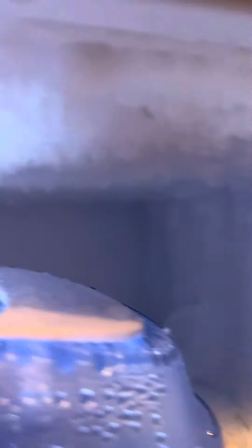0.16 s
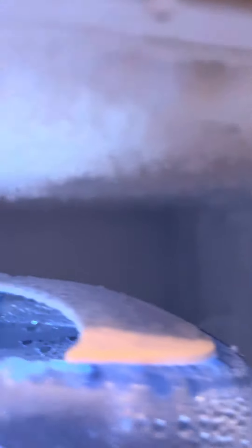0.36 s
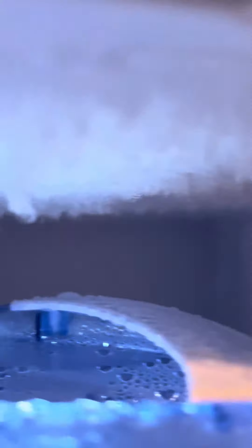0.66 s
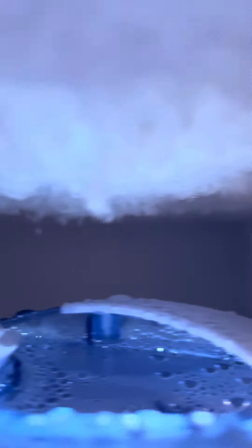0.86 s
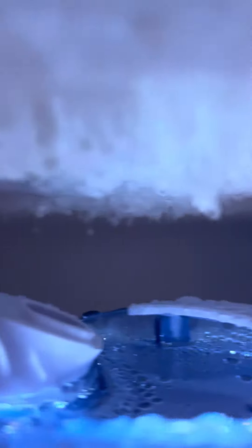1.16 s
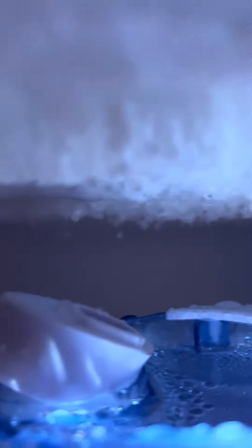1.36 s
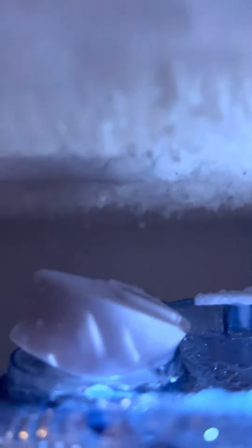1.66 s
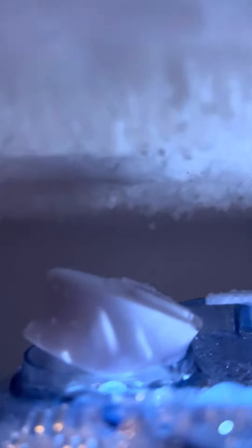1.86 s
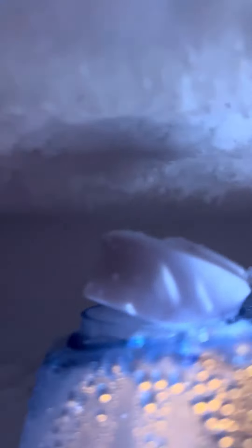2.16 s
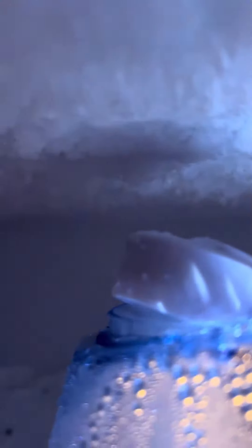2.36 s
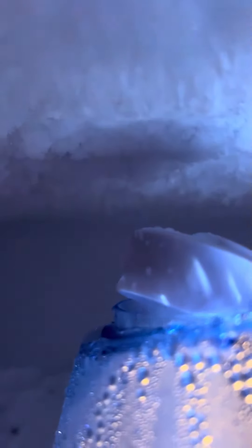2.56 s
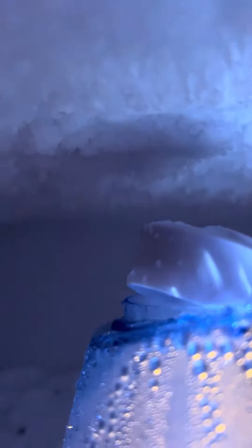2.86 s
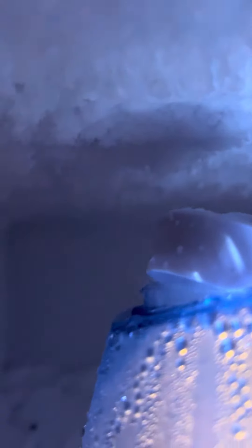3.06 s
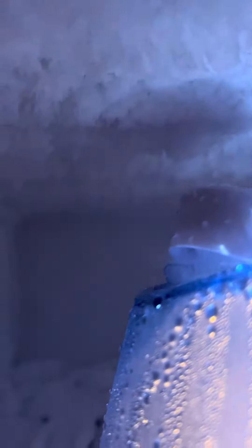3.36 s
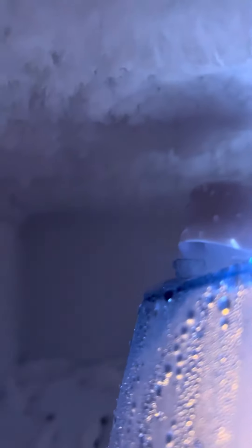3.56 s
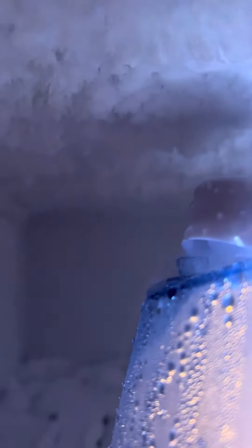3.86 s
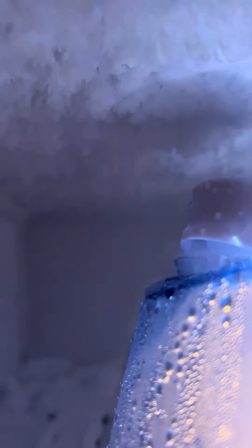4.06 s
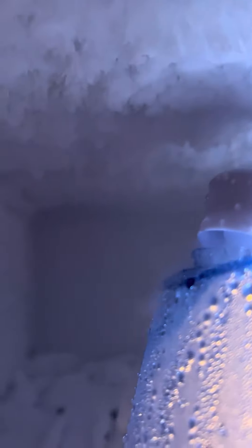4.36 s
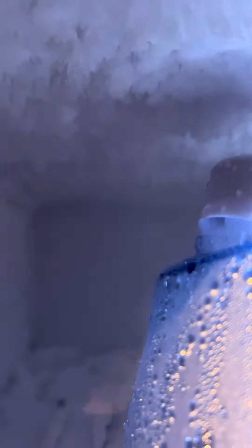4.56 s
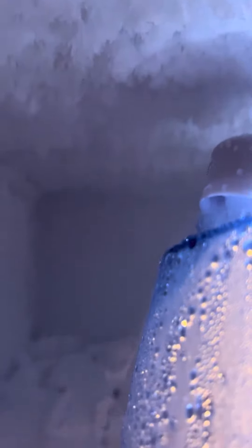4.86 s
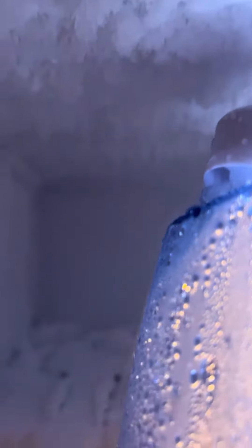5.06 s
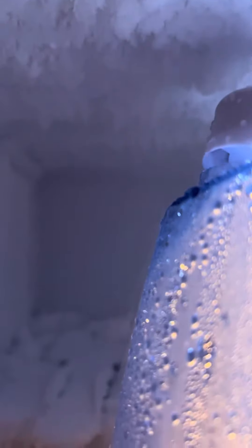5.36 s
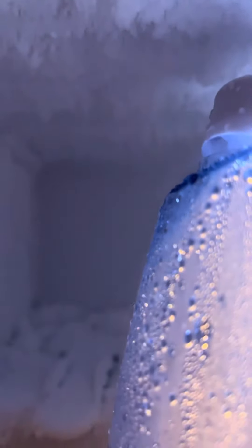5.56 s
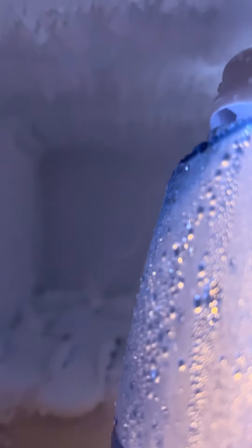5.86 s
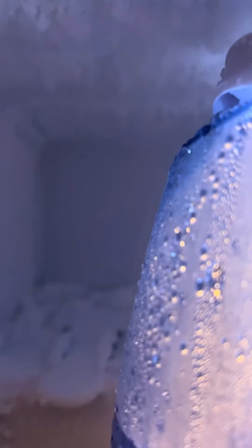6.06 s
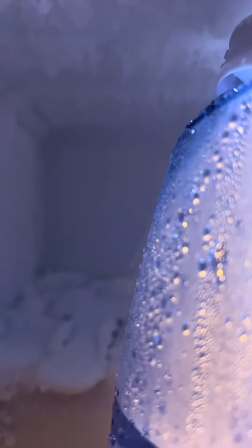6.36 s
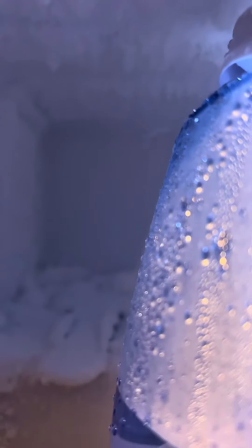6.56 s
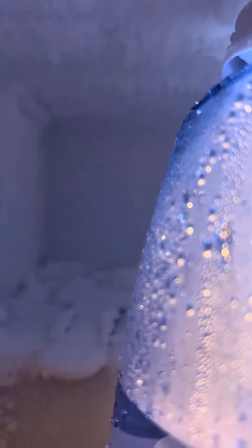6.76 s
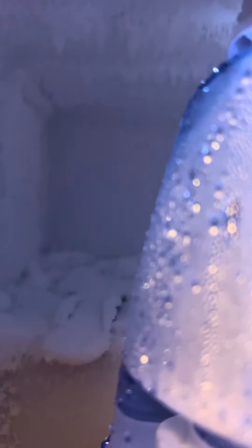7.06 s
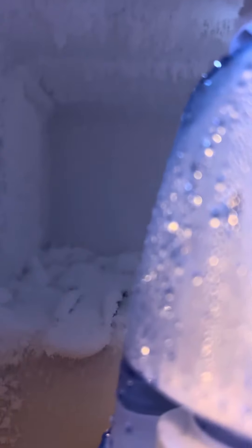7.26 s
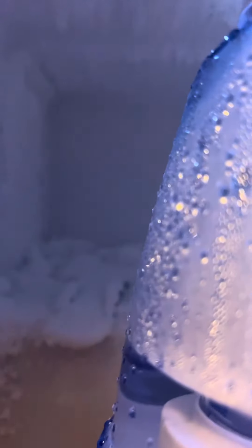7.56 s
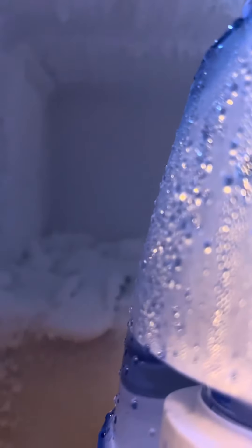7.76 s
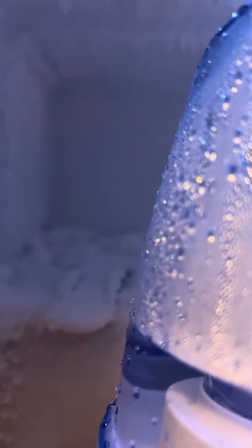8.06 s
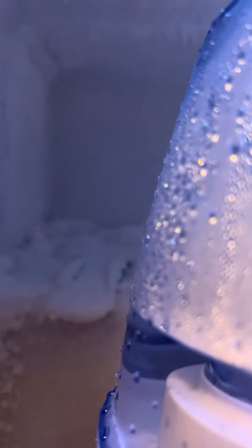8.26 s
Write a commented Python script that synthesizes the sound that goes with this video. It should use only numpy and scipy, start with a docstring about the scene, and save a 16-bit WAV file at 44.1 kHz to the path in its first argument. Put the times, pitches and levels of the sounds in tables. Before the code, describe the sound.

Inside a small frosted freezer, steady bass hum dominates, with brief dips near two seconds and at the end. Beneath the soft hiss, fine water droplets patter and fizz in irregular clumps. Ticks become frequent after the first second, with sharper knocks around 4.3 and 5.1 seconds and a last bright cluster near 8.4. The handheld stereo microphone starts near the door and works inward, close to the sounds.

```python
"""A compressor hums in a frosted freezer compartment over soft air hiss while a small humidifier spits water.
Near the door at first, the microphone dulls the drops and loses a few hum orders around 0.6 s; then it works
its way inside, easing out a little near 6 s. Ticks stand out, the strongest at 4.3, 5.1 and 8.4 s.
The hum is summed sines that beat with other motors and the mains; the hiss is noise in bands;
drops strike resonators, and each tick is a short puff of noise."""
import sys
import numpy as np
from scipy import signal
from scipy.io import wavfile

SR = 44100
rng = np.random.default_rng(int(sys.argv[2]) if len(sys.argv) > 2 else 0)


def invert_db(level):
    """Linear amplitude ratio for a level in decibels (20 dB per decade), elementwise."""
    return 10 ** (np.asarray(level, dtype=float) / 20)


def digitize_waveform(pressure):
    """Quantize a signal to 16-bit integers and store it at the path in sys.argv[1].

    Rows of a 2-D input are taken as channels; values are limited to [-1, 1].
    """
    field = np.atleast_2d(pressure).T
    bounded = np.clip(field, -1, 1)
    quanta = np.round(bounded * 32767).astype(np.int16)
    wavfile.write(sys.argv[1], SR, quanta)


N = 371322
TURN_HZ = 58.914   # turn rate of the compressor

# place of the microphone, from the door (0) to the back (1): (time [s], depth [0-1])
DEPTH = [(0, 0.27), (.7, 0), (1.4, 0.32), (2, 0.57), (3, 0.72), (4.5, 0.82), (6, 0.69), (7.3, 0.91),
         (8.42, 0.95)]


def rms_one(x):
    """Scale to unit rms."""
    return x / np.sqrt(np.mean(x ** 2) + 1e-20)


def in_time(rows):
    """Columns of a table, joined by straight lines at every sample."""
    s, *columns = np.transpose(rows)
    return [np.interp(np.arange(N) / SR, s, c) for c in columns]


def at_hz(points, hz):
    """Read a spectrum on a log-frequency axis."""
    table_hz, values = np.transpose(points)
    return np.interp(np.log(hz), np.log(table_hz), values)


def drift(corner_hz):
    """Slow chance of spread 1: noise twice through a one-pole low-pass, made at every 40th sample."""
    r = np.exp(-2 * np.pi * corner_hz * 40 / SR)
    noise = rng.standard_normal(N // 40 + 2002)
    slow = signal.lfilter([1], [1, -2 * r, r * r], noise)[2000:]   # skip the filter's start
    return np.interp(np.arange(N) / 40, np.arange(len(slow)), rms_one(slow))


def band(x, hz, octaves):
    """Band-pass around a centre."""
    edges = hz * 2.0 ** (np.array([-.5, .5]) * max(octaves, .05))
    edges = np.clip(edges, 10, .45 * SR)
    return signal.sosfilt(signal.butter(2, edges, "band", fs=SR, output="sos"), x)


def sides(db):
    """Left and right gains for a left-right level difference."""
    return invert_db(np.array([[db / 2], [-db / 2]]))


def air(patchy_db):
    """Air hiss: third-octave bands of stereo noise, each with its own level, flicker and left-right likeness."""
    # hiss spectrum, relative: (frequency [Hz], level per Hz [dB])
    spectrum = [(25, -25.5), (45, -6), (80, -3), (130, -7), (200, 0.5), (250, -19), (320, -14),
                (420, -10.5), (620, -17.5), (780, -12.5), (900, -24.5), (1050, -19.5), (1400, -24.5),
                (2600, -28), (3200, -32), (5000, -33.5), (6300, -42), (7500, -45), (9500, -51.5),
                (12000, -47.5), (13800, -53), (15500, -49.5)]
    # change of the hiss from the door to the back: (frequency [Hz], change [dB])
    inside = [(200, 0), (300, 1.5), (450, 4), (700, -3), (1050, -2.5), (1800, -4.5), (3500, 10),
              (5500, 3.5), (7500, 8.5), (10000, -1.5)]
    # how alike the two sides are: (frequency [Hz], left-right likeness [-1 to 1])
    likeness = [(60, 1), (130, 0.99), (200, .98), (290, .9), (450, 0.64), (640, 0.41), (1300, 0.5),
                (1750, 1), (2300, 0.84), (3100, 0.077), (6820, 0.64), (15000, .1)]
    # balance of the two sides: (frequency [Hz], left-right difference [dB])
    balance = [(60, -2), (110, 1), (200, 3), (380, 4.5), (700, 1.5), (1290, 0.5), (2380, 0), (4400, 1),
               (8120, -0.5), (15000, 0.0)]
    level_db = -53.5   # rms of the whole hiss
    out, together, (depth,) = 0, drift(15.0), in_time(DEPTH)
    white = rng.standard_normal((2, 2, N))   # neighbouring bands get unrelated noise
    for k, hz in enumerate(28 * 2 ** np.arange(0, 9.3, 1 / 3)):
        mid, side = band(white[k % 2], hz, 1 / 3)
        alike = np.clip(at_hz(likeness, hz), -1, 1)
        flicker = 1.15 * together + 0.91 * drift(18)
        flicker_db = patchy_db * min(hz / 3000, 1) * flicker   # the treble is the least even
        band_db = at_hz(spectrum, hz) + (depth - .5) * at_hz(inside, hz) + flicker_db
        stereo = np.sqrt(1 + alike) * mid + np.sqrt(1 - alike) * side * [[1], [-1]]
        out = out + invert_db(band_db) * sides(at_hz(balance, hz)) * stereo
    return invert_db(level_db) * rms_one(out)


def falls(per_s, spread_db, clump_db):
    """Moments (samples) and sizes of the drops: random falls whose rate drifts, so they land in clumps."""
    chance = per_s * invert_db(clump_db * drift(11.0)) / SR
    at = np.flatnonzero(rng.random(N) < chance)
    return at, invert_db(spread_db * np.minimum(rng.exponential(1, N), 4))[at]


def cavity(hz, width_hz, level_db, drops, drop_share):
    """Splash noise and the drops ring a hollow whose pitch shifts with the microphone's place."""
    at, sizes = drops
    struck = np.zeros(N)
    struck[at] = sizes
    drive = rng.standard_normal((2, N)) * (1 - drop_share + drop_share * rms_one(struck))
    pole = [1, -np.exp(-np.pi * width_hz / SR)]   # used twice: a soft onset
    envelope = signal.lfilter([1], pole, signal.lfilter([1], pole, drive))
    phase = 2 * np.pi * np.cumsum(hz) / SR
    ring = envelope[0] * np.cos(phase) + envelope[1] * np.sin(phase)
    return invert_db(level_db) * rms_one(ring)


def fine_spray(depth):
    """Fizz of the fine spray: a dense mist of drops rings a higher, broader resonance, separately on each side."""
    # swell of the fizz: (time [s], level [dB])
    swell = [(0, -92), (.85, -75), (1.0, -83), (1.9, -83), (2.1, -83), (3.5, -74), (5.5, -82), (6.5, -87),
             (7.4, -95), (8.42, -84)]
    door_hz, back_hz = 4810, 6950
    fizz_hz, (fizz_db,) = door_hz + (back_hz - door_hz) * depth, in_time(swell)
    mist = falls(per_s=1500, spread_db=5.5, clump_db=9.0)
    return np.array([cavity(fizz_hz, 1300, fizz_db, mist, drop_share=0.9) for side in range(2)])


def droplets(level_db, depth, drops, pick_db, cycles, tilt_db, onset_octaves):
    """Each drop rings the tank at 2 to 7.6 kHz, a few pitches strongly, the rest faintly; each pitch has its side."""
    dulled_db_per_octave = -10.5   # above 4 kHz, at the door; gone at the back
    at, sizes = drops
    out = np.zeros((2, N))
    for hz, lag in zip(np.geomspace(2000, 7600, 30), rng.integers(-4, 5, 30)):   # lag of the right in samples
        pick = invert_db(pick_db * np.minimum(rng.standard_normal(N)[at], 1.8))
        clicks = np.full(N, 1e-18)
        clicks[at] = sizes * pick * rng.choice([-1, 1], N)[at]
        r = invert_db(-60 * hz / (cycles * SR))   # 60 dB down after this many cycles
        w = 2 * np.pi * hz / SR
        ring = signal.lfilter([0, np.sin(w)], [1, -2 * r * np.cos(w), r * r], clicks)
        ring = band(ring, hz, onset_octaves)   # a soft landing: no sharp click
        dulled_db = dulled_db_per_octave * (1 - depth) * max(np.log2(hz / 4000), 0)
        pitch_db = tilt_db * np.log2(hz / 2000) + dulled_db
        out += invert_db(pitch_db) * np.array([ring, np.roll(ring, lag)])
    return invert_db(level_db) * rms_one(out)


def ticks(shared, snap, ragged_db):
    """Each tick is a sudden puff of noise in its own band that dies within hundredths of a second."""
    # ticks, levels before the echo: (time [s], peak before the side gains [dB], centre [Hz],
    # width [octaves], left-right difference [dB])
    tick_rows = [(0.908, -43, 5570, 0.41, 0), (1.095, -58, 5000, .6, 0), (1.67, -63, 7300, .4, 3),
                 (1.402, -59, 13000, .6, 0), (1.53, -58, 9500, 0.94, 0), (1.794, -47, 1610, 0.17, 0),
                 (1.932, -50, 5400, 1, 1), (1.933, -48, 1610, 0.52, 0), (1.962, -47, 13550, 1.15, 0),
                 (2.0245, -43.5, 2450, 0.45, 1), (2.025, -47, 1620, 0.28, 1), (2.05, -51.5, 4760, 0.6, 2),
                 (2.264, -53, 5470, 0.78, 0), (2.461, -51, 5600, 0.8, 0), (3.099, -53, 2200, 0.97, 0),
                 (3.24, -49, 4730, 0.42, .5), (3.481, -49, 3580, 0.77, 4), (3.567, -46.5, 8300, 0.33, -1),
                 (3.956, -49, 3220, 0.35, .5), (4.146, -50, 4740, 0.73, 2), (4.174, -52.5, 4630, 0.54, 4),
                 (4.212, -55, 4970, 0.48, 0), (4.225, -49, 420, .3, 3), (4.25, -51, 420, 0.19, 3),
                 (4.292, -58, 3000, 0.23, -2), (4.3012, -37.5, 2600, 1.36, -6), (4.302, -38, 1970, 0.69, 0),
                 (4.519, -64, 13100, .6, 0), (4.585, -57, 3500, 0.45, 0), (4.6, -55, 4000, .2, 0),
                 (4.608, -59, 14500, .4, 0), (4.632, -52, 3600, 0.78, 0), (4.665, -46, 2600, 1.1, 0),
                 (5.014, -49, 2000, 0.4, 0), (5.11, -38, 2530, 0.84, -2), (5.1135, -39.5, 2080, 0.64, -2),
                 (5.549, -45.5, 12050, 1.2, 0), (5.577, -50, 3730, 0.7, -2),
                 (5.673, -46.5, 4030, 0.36, 1.5), (5.711, -49, 2160, 0.87, 0), (5.695, -53, 6500, .5, 0),
                 (5.78, -57, 4300, .5, -2), (5.847, -49, 4200, 0.85, 5), (5.891, -50, 14700, 0.72, 2),
                 (5.914, -49.5, 3400, 0.83, 2), (6.055, -50, 2750, 0.55, -.5), (6.187, -52, 4200, .5, 0),
                 (6.29, -58, 4800, 0.18, 0), (6.31, -56, 1730, 0.27, 0), (6.347, -52, 4250, 0.57, -2),
                 (6.485, -48.5, 3470, 0.37, 4), (6.503, -46, 2600, 1.2, 0), (6.555, -50, 4000, 0.62, 0),
                 (6.658, -49, 3600, 0.7, 1.5), (6.674, -48, 3200, 0.62, 2), (6.764, -55, 4100, .3, 0),
                 (6.866, -52.5, 1730, 0.34, -1), (6.868, -51, 4530, 0.33, 0), (6.95, -46.5, 1730, 0.24, 2),
                 (6.958, -51, 4260, 0.26, 0), (7.134, -64, 4800, .5, 16), (7.215, -41.5, 2400, 1.7, 0),
                 (7.355, -52, 3930, .4, 0), (7.377, -51.5, 8380, 0.82, 0), (7.459, -47, 3200, 1.5, 0),
                 (7.593, -44, 3260, 1.1, -4), (7.645, -47, 4240, 0.73, 0), (7.8, -57, 1730, .25, 0),
                 (8.135, -54, 3400, 0.52, 6), (8.18, -54, 3000, 0.48, 0), (8.195, -51, 1590, 0.4, 2),
                 (8.365, -47, 410, 0.23, 3), (8.372, -43, 11900, .35, 0), (8.374, -50, 14600, .25, 1),
                 (8.373, -50, 4200, 0.44, 1), (8.373, -40, 8600, .45, 1)]
    faint_count, faint_db, faint_hz = 6, -68, 13500   # very high faint ticks at random moments
    rise_s, right_lag = 0.00056, 1   # time constant of the onset; samples by which the right comes later
    out, t = np.zeros((2, N + 4096)), np.arange(4096) / SR
    faint = []
    for _ in range(faint_count):
        level_chance, side_chance = rng.standard_normal(2)
        faint.append((rng.random() * N / SR, faint_db + 3 * level_chance, faint_hz, .6, side_chance))
    for s, peak_db, hz, octaves, side_db in list(tick_rows) + faint:
        # 12 ms at 4 kHz and .6 octave; higher and wider ticks die sooner
        t60 = 0.012 * (hz / 4000) ** -0.1 * (max(octaves, .05) / .6) ** -0.5
        envelope = invert_db(-60 * t / t60) * (1 - np.exp(-t / rise_s))
        common, left, right = rng.standard_normal((3, len(t))) * envelope
        common *= invert_db(ragged_db * np.repeat(rng.standard_normal(64), 64))   # the contact stutters
        common[0] += snap * octaves ** 2   # the first contact is a hard snap, strongest in broad ticks
        both = np.array([common, np.roll(common, right_lag)])
        puff = band(shared * both + (1 - shared) * np.array([left, right]), hz, octaves)
        puff = band(puff, hz, 2.1 * octaves)   # steeper skirts
        at = round(s * SR)
        out[:, at:at + len(t)] += invert_db(peak_db) * sides(side_db) * puff / np.abs(puff).max()
    return out[:, :N]


def compartment(x):
    """The small hard box answers every drop and tick with a short dense tail, its own on each side."""
    t60_s, echo_db, frost_cut_hz = 0.065, -9, 7000   # frost soaks up the treble
    t = np.arange(4096) / SR
    tail = rng.standard_normal((2, len(t))) * invert_db(-60 * t / t60_s) * (t > .002)
    tail = signal.lfilter(*signal.butter(1, frost_cut_hz, fs=SR), tail)
    tail = invert_db(echo_db) * tail / np.sqrt(np.sum(tail ** 2, axis=1, keepdims=True))
    return x + signal.fftconvolve(x, tail, axes=1)[:, :N]


def other_tones(waver_db):
    """Steady sines of the mains and of other machines, each wavering slowly in level."""
    # tones: (frequency [Hz], rms level in the hum [dB])
    tones = [(156.98, -62.5), (239.99, -73), (357.66, -78), (359.96, -74), (479.94, -76)]
    t, out = np.arange(N) / SR, np.zeros(N)
    for hz, level_db in tones:
        out += invert_db(level_db + waver_db * drift(0.52)) * np.sin(2 * np.pi * hz * t)
    return out


def whines(turn, waver_db, blur_rad):
    """Thin whines: high orders of the turn rate, pulsed once a turn and heard only at some places."""
    # whines: (multiple of the turn rate, greatest rms level before the pulsing [dB],
    # loudest at [s], time from there to a fade of 4.3 dB [s], left-right difference [dB])
    whine_rows = [(49, -77.5, 2.3, 1.27, -2), (50, -86, 1.6, 0.97, -2), (51, -80.5, 0.092, 0.23, 5),
                  (52, -83, 0.12, 0.33, 8), (52, -79.5, 3.95, 0.99, 8.5), (56, -87, 1.3, 0.38, 13),
                  (57, -82.5, 1.5, 0.49, 11), (58, -82, 1.9, 1.1, 6), (59, -88, 2.3, 0.87, 4),
                  (60, -96, 1.3, 0.71, 2), (189, -99, 6.9, 1.4, 8), (187, -101, .5, .5, 0)]
    t, out = np.arange(N) / SR, np.zeros((2, N))
    pulse = invert_db(2.3 * np.cos(turn))
    for multiple, level_db, at_s, length_s, side_db in whine_rows:
        heard = np.exp(-.5 * ((t - at_s) / length_s) ** 4) * pulse
        level = invert_db(level_db + waver_db * drift(12.0)) * sides(side_db)
        out += heard * level * np.sin(multiple * turn + blur_rad * drift(8.0))
    return out


def upper_orders(turn, depth, waver_db):
    """Steadier multiples of the turn rate, which trail the lowest ones and waver in level."""
    # orders: (multiple of the turn rate, rms level at the back before the sides [dB],
    # rise from door to back [dB])
    orders = [(4, -66.5, 2.5), (5, -66.5, 3.5), (6, -82.5, 1), (7, -73.5, -1.5), (8, -63, 12), (9, -59, 5),
              (10, -84.5, -7), (11, -71, -1.5), (12, -69.5, 5), (13, -81, 14), (14, -77, 6.5),
              (15, -96.5, -9), (16, -90, -11), (17, -90, -15.5)]
    # how each order reaches the two ports, multiple: (left-right difference [dB], left lead [rad])
    order_sides = {4: (.5, .3), 5: (2, .1), 6: (1, .1), 7: (10, .6), 8: (6, .2), 9: (3, .5), 10: (-8, 1.5),
                   11: (0, -.5), 12: (3, -1.0), 13: (2, -.7), 14: (2, .6), 15: (-2, .5), 16: (-4, .4),
                   17: (-6, .1)}
    # the microphone passes a dead spot of some orders near the door: {multiple: loss [dB]}
    dead_spot, dead_at_s, dead_length_s = {7: 16, 8: 12, 12: 13}, 0.64, 0.32
    t, out = np.arange(N) / SR, np.zeros((2, N))
    dead = np.exp(-.5 * ((t - dead_at_s) / dead_length_s) ** 2)
    for multiple, level_db, rise_db in orders:
        side_db, lead = order_sides[multiple]
        phase = multiple * turn - 1.75 * (multiple - 3.5)   # lag in rad per order
        lost_db = dead_spot.get(multiple, 0) * dead
        level = invert_db(level_db + rise_db * (depth - 1.0) + waver_db * drift(4.4) - lost_db)
        out -= level * sides(side_db) * np.cos(phase + np.array([[lead / 2], [-lead / 2]]))
    return out


def low_hum(turn, depth, waver_db):
    """The lowest orders form one downward push a turn; neighbouring tones slip past, so each swells and fades."""
    # three lowest orders, before the pickup: (multiple of the turn rate, rms level at the back [dB],
    # rise from door to back [dB])
    orders = [(1, -38, 5), (2, -61.5, -3.5), (3, -50.5, 0.8)]
    # tones of two other motors and the mains, before the pickup: (frequency [Hz],
    # in step with the compressor at [s], rms level at half depth [dB], rise from door to back [dB])
    beating = [(59.256, .9, -45.7, -2.1), (118.495, 1.203, -61.4, -.1), (177.746, .674, -64.4, -.7),
               (58.437, 1.59, -51, -2), (116.875, .821, -74.7, -.4), (175.147, .13, -62.3, -.1),
               (119.991, .123, -62.1, -2.1)]
    # how well the hum reaches the hand-held microphone: (time [s], first order [dB], third order [dB])
    pickup = [(0, 2, -1.5), (.35, 0.5, -2.5), (.7, -0.5, 0.5), (1.3, 1.5, -1.5), (1.8, 1.5, 5),
              (2.0, -7, 3.5), (2.16, -14, -1.5), (2.4, 3.5, -3), (2.65, 0, 2), (2.85, -7, 0.5), (3.2, 1, 2),
              (3.9, 1, 2.5), (4.3, -0.5, -6), (4.5, -2, 1), (4.85, 0.5, 1), (5.35, -2, 3.5), (5.7, 1.5, 1),
              (6.2, 1, 1), (6.45, 1, -2.5), (6.8, 0, 4), (7.05, 1, -4), (7.3, 1, 4.5), (7.6, 1, -1.5),
              (8.0, .5, 0.5), (8.42, -10, -2)]
    t, (first_db, third_db) = np.arange(N) / SR, in_time(pickup)
    groups = []
    for k, (_, db, rise_db) in enumerate(orders):
        level = invert_db(db + rise_db * (depth - 1.0) + waver_db * k * drift(2.5))   # the first does not waver
        groups.append(level * np.cos((k + 1) * turn))
    for hz, step_s, db, rise_db in beating:
        k = round(hz / TURN_HZ)
        slip = 2 * np.pi * (hz - k * TURN_HZ) * (t - step_s)
        groups[k - 1] += invert_db(db + rise_db * (depth - 0.5)) * np.cos(k * turn + slip)
    return -(invert_db(first_db) * groups[0] + groups[1] + invert_db(third_db) * groups[2])


def hum(waver_db, whine_waver_db, whine_blur_rad):
    """Compressor hum: sines at multiples of its turn rate, with the tones of the mains and other machines."""
    turn, (depth,) = 2 * np.pi * TURN_HZ * np.arange(N) / SR, in_time(DEPTH)
    out = upper_orders(turn, depth, waver_db) + low_hum(turn, depth, waver_db=0.69)
    out += whines(turn, whine_waver_db, whine_blur_rad) + other_tones(waver_db)
    return np.sqrt(2) * out   # rms levels to sine peaks


def scene():
    """Air, spray, ticks and hum add up at the two ports."""
    # the spray spurts and slackens: (time [s], droplets before the echo [dB], cavity [dB])
    spray = [(0, -66.5, -80), (.6, -72, -77), (1.3, -69.5, -65.5), (1.8, -66.5, -65.5), (2.3, -69, -68),
             (2.75, -69, -66.5), (2.95, -69, -66.5), (3.2, -65, -65.5), (3.45, -71, -71),
             (3.8, -73.5, -68.5), (4.1, -66.5, -67), (4.45, -73.5, -71), (4.95, -64.5, -66.5),
             (5.3, -71.5, -75.5), (5.85, -65.5, -69), (6.55, -69, -69.5), (7.05, -68, -73),
             (7.4, -71.5, -69.5), (7.8, -71, -71.5), (8.42, -65, -71)]
    door_hz, back_hz = 1559, 1730   # pitch of the cavity
    (droplet_db, cavity_db), (depth,) = in_time(spray), in_time(DEPTH)
    cavity_hz = door_hz + (back_hz - door_hz) * depth
    drops = falls(per_s=420, spread_db=3.5, clump_db=5.5)
    hollow = cavity(cavity_hz, 286, cavity_db, drops, drop_share=0.62)
    fizz = fine_spray(depth)
    patter = droplets(droplet_db, depth, drops, pick_db=10.5, cycles=72, tilt_db=0.5, onset_octaves=0.34)
    boxed = compartment(patter + ticks(shared=0.77, snap=2.7, ragged_db=3.0))
    machine = hum(waver_db=1.3, whine_waver_db=1.5, whine_blur_rad=0.21)
    return air(patchy_db=1.5) + hollow + fizz + boxed + machine


def roll_off(x):
    """The treble ends steeply here."""
    return signal.sosfilt(signal.butter(12, 16150, fs=SR, output="sos"), x)


def record(dry):
    """A steep low-pass cuts the top of the mix, 60 dB down from 15.9 kHz."""
    low_pass = signal.cheby2(12, 60, 15900, fs=SR, output="sos")
    mix = signal.sosfilt(low_pass, dry)
    return roll_off(mix)


dry = scene()
out = record(dry)
digitize_waveform(out)
```